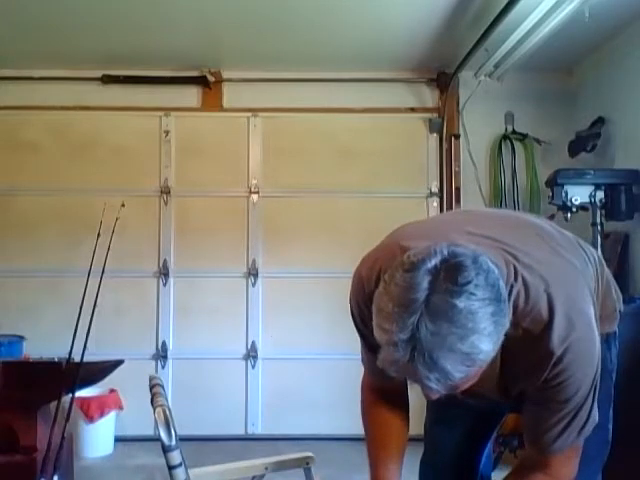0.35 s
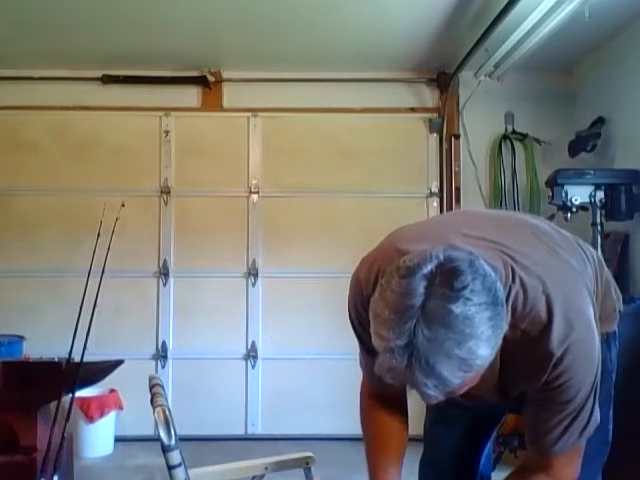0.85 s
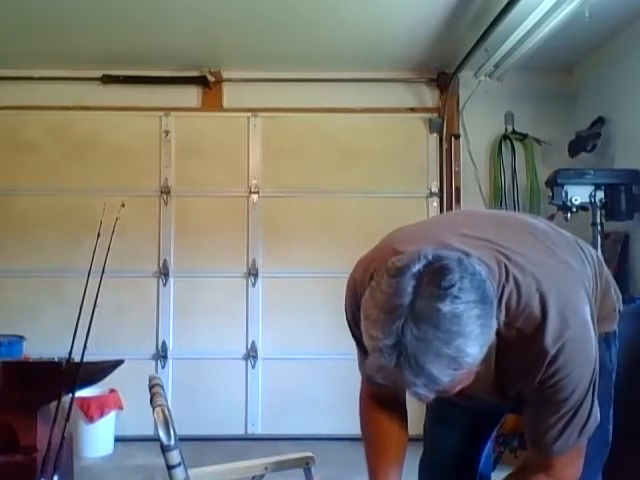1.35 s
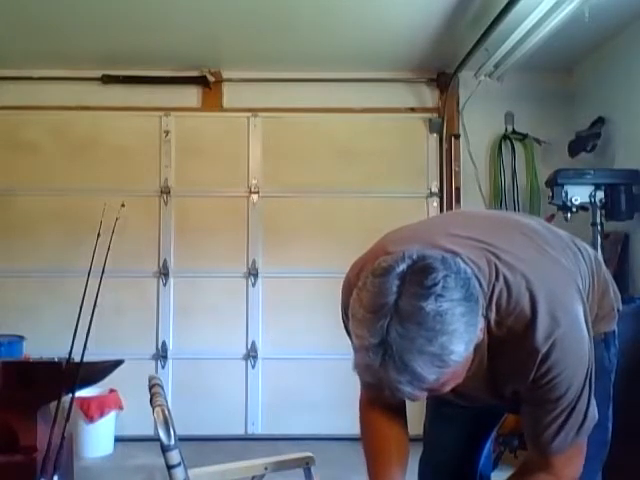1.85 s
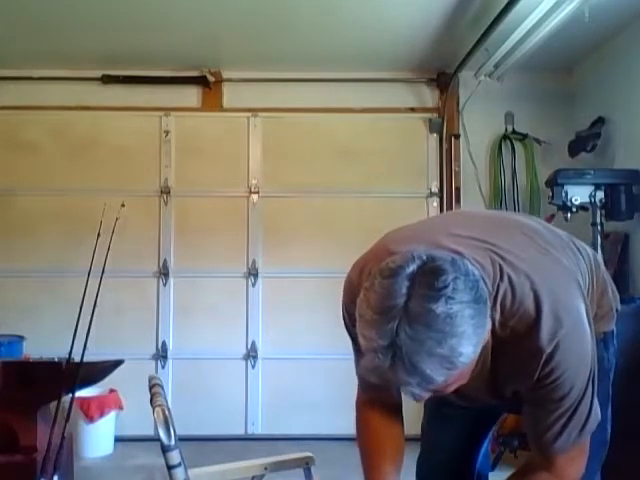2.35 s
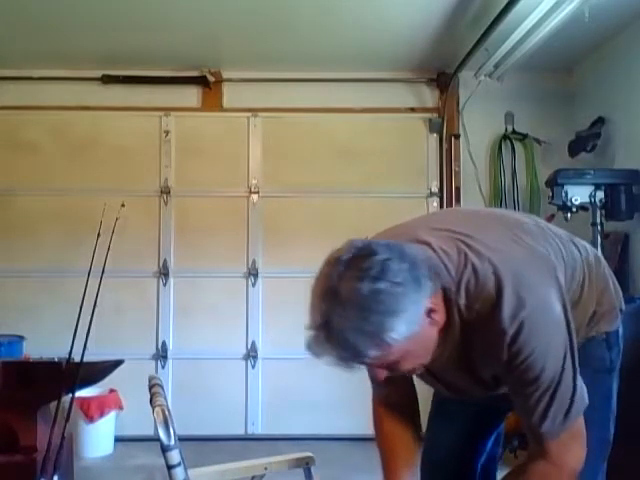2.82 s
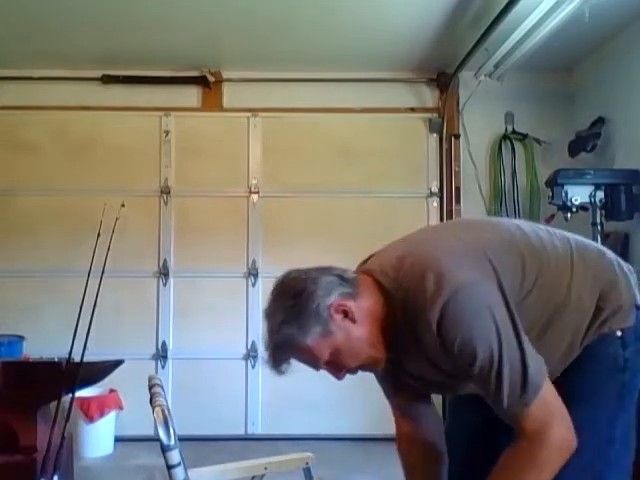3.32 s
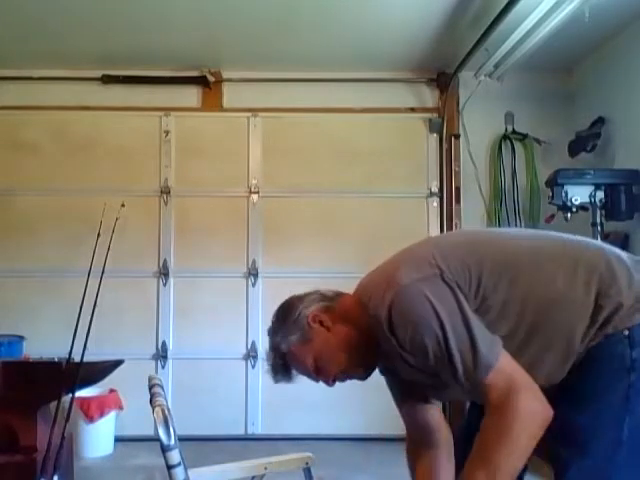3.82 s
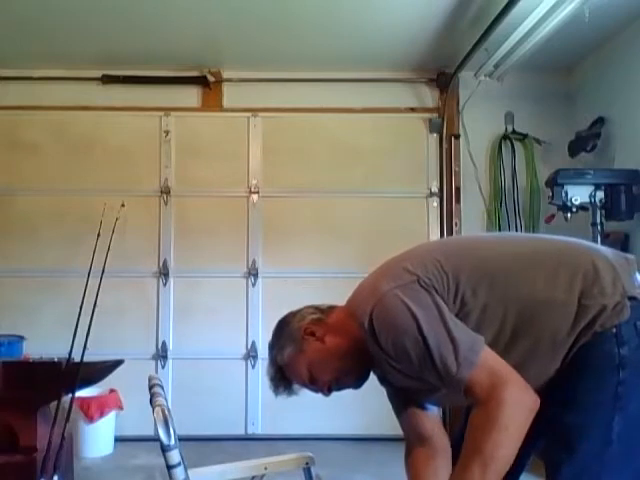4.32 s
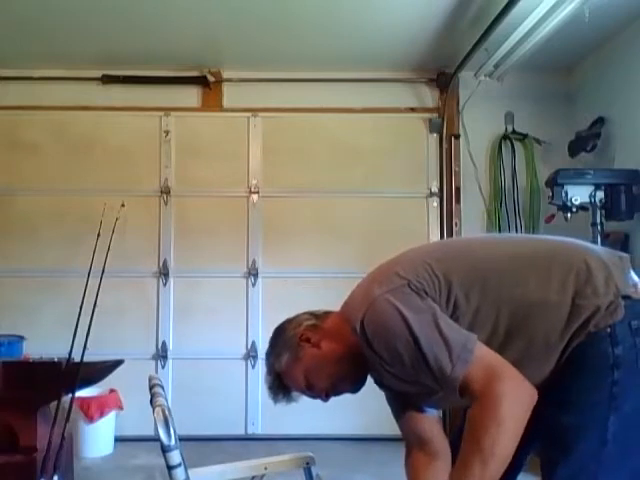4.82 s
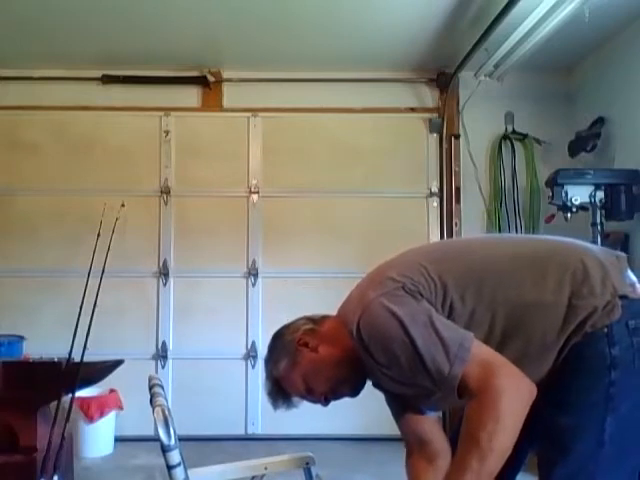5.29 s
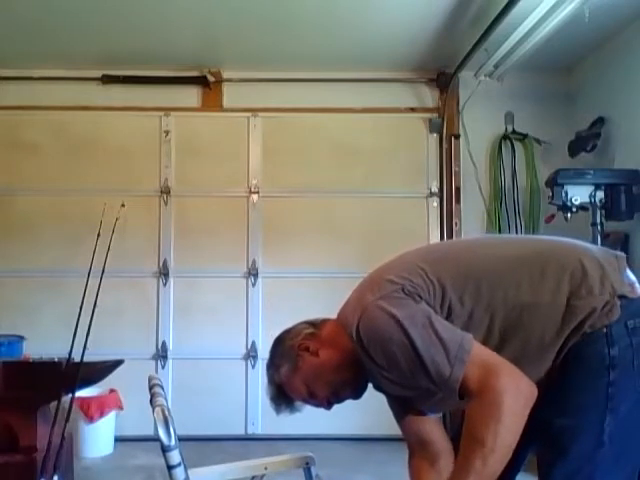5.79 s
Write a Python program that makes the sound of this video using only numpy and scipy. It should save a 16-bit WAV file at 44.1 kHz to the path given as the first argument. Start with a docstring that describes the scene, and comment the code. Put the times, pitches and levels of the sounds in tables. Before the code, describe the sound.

A bare garage murmurs very softly throughout with unsteady low rumble, faint machine hum and airy hiss. From about 0.4 s, small metal parts tap plastic pipe: dry clicks with a hollow, nasal ring around 1.4 kHz and a short grainy room echo. At 1.0 s a hard knock leaps out, thuds dully and is quickly choked. Tiny taps follow until 2.3 s, when a loud, bright metallic cluster rattles for a quarter second and cuts off. Near 3 s a shoe scuffs gritty concrete, swelling again into a brief sharp knock at 3.3 s. Sparse taps continue, with brighter metal ticks at 4.1, 4.75 and 4.95 s. From 5.0 to 5.6 s a part slides with a barely audible pipe-coloured hiss among small clicks. At 5.9 s a loud hollow knock bursts from a quick clatter, then sinks into last ticks around 6 s. Mono, narrow-band, treble steeply cut near 9 kHz.

```python
"""A bare garage hums, rumbles and hisses faintly: unsteady sines over shaped noise.
From 0.4 s small metal parts click and knock on plastic pipe near a narrow-band microphone; each contact
drives pipe and metal resonances plus a noise echo. Four loud knocks leap out (1.0, 2.3, 3.3, 5.9 s) by a
gain that soon sinks and cuts their echo short; dull thumps lie inside them. At about 3 s a shoe scuffs the
floor (swelling noise); from 5.0 s a part slides along the pipe (noise through its resonances)."""
import sys
import numpy as np
from scipy import signal
from scipy.fft import rfft, irfft, next_fast_len
from scipy.io import wavfile
from scipy.ndimage import uniform_filter1d, map_coordinates

SR = 44100
rng = np.random.default_rng(int(sys.argv[2]) if len(sys.argv) > 2 else 0)


def log_audio(samples):
    """Write samples as a 16-bit WAV file to the path given in sys.argv[1]."""
    # one column per channel
    frames = np.atleast_2d(samples).T
    # limit to full scale, then quantise
    limited = np.clip(frames, -1, 1)
    pcm = np.round(limited * 32767).astype(np.int16)
    wavfile.write(sys.argv[1], SR, pcm)


def undo_db(level):
    """Turn decibels back into plain size, where 20 dB means ten times bigger."""
    steps = np.asarray(level, float) / 20
    return 10 ** steps


N = 271656


def unit(x):
    """Scale to rms 1."""
    return x / np.sqrt(np.mean(x ** 2) + 1e-20)


def along(points, hz):
    """Interpolate (frequency [Hz], value) points on a log frequency axis."""
    f, v = np.transpose(points)
    return np.interp(np.log(hz + 1), np.log(f + 1), v)


def wobble(knots_per_s):
    """Smooth random curve through normal-distributed knots."""
    knots = rng.standard_normal(int(N * knots_per_s / SR) + 4)
    return map_coordinates(knots, [np.arange(N) * knots_per_s / SR])


def coloured(spectrum):
    """Noise of rms 1 with the given spectrum."""
    size = next_fast_len(N)
    gain = undo_db(along(spectrum, np.fft.rfftfreq(size, 1 / SR)))
    return unit(irfft(rfft(rng.standard_normal(size)) * gain, size)[:N])


def patches(shape):
    """Random field of rms 1, smooth over neighbouring pitches and moments."""
    over_pitch = uniform_filter1d(rng.standard_normal(shape), size=3, axis=0)
    return unit(uniform_filter1d(over_pitch, size=7, axis=1))


def resonances(modes, f, scatter_db):
    """Causal response of damped modes, each at a new strength, with alternating sign."""
    scatter = rng.normal(0, 1, len(modes)) * scatter_db
    response = 0
    for k, (centre_hz, width_hz, db) in enumerate(modes):
        damping = 1j * f * width_hz
        mode = damping / (centre_hz * centre_hz - f * f + damping)
        response = response + (-1) ** k * undo_db(db + scatter[k]) * mode
    return response


# Low rumble spectrum: (frequency [Hz], relative density [dB per Hz])
RUMBLE = [(24, -78.5), (40, -55), (91, -47), (111, -13), (134, 1.5), (192, 4), (233, -3.5), (428, -6),
          (538, -13.5), (700, -12.5), (910, -46), (1540, -120)]
# Air hiss spectrum: (frequency [Hz], relative density [dB per Hz])
AIR = [(290, -56), (500, -20.5), (544, -18), (584, -18), (838, -6.5), (911, -10), (1010, -2), (1170, -10),
       (1440, -11.5), (1680, -11.5), (1850, -15), (2300, -19.5), (2470, -23), (5780, -26), (8800, -42.5),
       (11400, -74), (19400, -120)]
# Machine tones: (frequency [Hz], relative level [dB])
HUM = [(177.6, -82.5), (296.1, -77), (430.7, -87), (468.3, -84), (818.3, -82), (1007, -87.5), (1480, -88.5)]


def room():
    """Low rumble, air hiss and machine tones unsteady in level and phase."""
    t = np.arange(N) / SR
    rumble = undo_db(-69 + 0.42 * wobble(2.7)) * coloured(RUMBLE)
    hiss = undo_db(-69.5 + 0.61 * wobble(6)) * coloured(AIR)
    hum = 0
    for hz, db in HUM:
        level = undo_db(db + 2.5 + 0.73 * wobble(12))
        hum = hum + level * np.sin(2 * np.pi * hz * t + 4.5 * wobble(9.3))
    return rumble + hiss + hum


# Wall decay: (frequency [Hz], t60 [s])
WALLS = [(800, 0.59), (2000, 0.69), (4000, .55), (8000, .5)]


def echo(size):
    """Fresh wall answer: noise patchy in time and pitch, each frequency dying at its own speed."""
    hz, t, z = signal.stft(rng.standard_normal(size), SR, nperseg=256)
    patchy_db = 2.5 * patches(z.shape)
    decay_db = -60 * t / along(WALLS, hz)[:, None]
    return signal.istft(z * undo_db(patchy_db + decay_db), SR, nperseg=256)[1][:size]


# Contacts before leaps: (time [s], level [dB], relative pipe ring [dB], click boost centre [Hz],
# relative wall echo [dB])
CONTACTS = [(0.4409, -54, 2.5, 2300, -7), (0.5731, -55.5, -2.5, 2230, -9), (0.9328, -48, -4.5, 3700, -8.5),
            (1.0345, -52, 5, 2410, -5.5), (1.047, -45.5, 2.5, 2476, -14), (1.4508, -60.5, 1, 3650, -10),
            (1.9532, -63, 3.5, 2320, -3.5), (2.0348, -63, -1.5, 3740, -1.5),
            (2.1735, -53.5, -3.5, 2440, -8.5), (2.257, -63.5, 6.5, 2430, 9.5),
            (2.2785, -34.5, -1.5, 4320, -5.5), (2.2936, -32, -6, 4080, -6), (2.3217, -36, 0, 3310, -8.5),
            (2.3449, -44, 2.5, 3660, -10), (3.2595, -44.5, -0.5, 2400, -8), (3.4134, -54.5, 1.5, 2270, -11),
            (3.7778, -56, -4.5, 3010, -11.5), (4.0838, -49, -17.5, 5600, -13.5),
            (4.7254, -54.5, -2, 2265, -6.5), (4.7521, -45.5, -15.5, 4190, -10),
            (4.78, -51.5, 0.5, 5420, -6.5), (4.9559, -40.5, -20, 3040, -9.5),
            (5.3014, -52.5, -5.5, 4130, -5.5), (5.3208, -53.5, -22, 5810, -13),
            (5.5797, -44, -15.5, 5900, -13), (5.8033, -63, 1, 2620, -7), (5.8212, -55.5, -5.5, 2730, -2),
            (5.8481, -46.5, 4, 4530, -5.5), (5.8741, -40, -2, 2540, -10.5),
            (5.8915, -47.5, -2.5, 3850, -22), (5.9241, -58.5, 7, 2630, -8), (5.9564, -50, -4, 3970, -8.5),
            (5.9946, -51.5, 1.5, 3980, -11), (6.0578, -48.5, -24, 5500, -7.5)]
# Pipe modes: (frequency [Hz], width [Hz], relative mean level [dB])
PIPE = [(1431.7, 48.7, -0.02), (1532.3, 44, -7), (1760, 13, -10.5), (2410, 190, -16)]
# Click spectrum: (frequency [Hz], relative density [dB per Hz])
CLICK = [(300, -50.5), (600, -22.5), (950, -13), (1150, 4), (2000, -1.5), (3000, -2), (5000, -1.5),
         (7000, -5.5), (7700, -17), (8000, -41), (8300, -30), (8900, -38), (9400, -66.5), (12000, -85),
         (19000, -110)]
# Metal modes: (frequency [Hz], width [Hz], relative mean level [dB])
METAL = [(3440, 23, -0.9), (3660, 70, -5), (3940, 70, -2.5), (4746, 120, 3), (5400, 47, -7), (5860, 18, -9),
         (6350, 120, -11.5)]
METAL_DB, METAL_DB_PER_DB = -10, 0.65  # metal gain for a -47 dB contact; growth with contact level
MIC_LOW_HZ, MIC_TOP_HZ = 320, 8220  # pickup band of the pipe ring


def contacts():
    """A short crack clicks and rings the metal, a push rings the pipe; the walls answer both."""
    size = 2 ** 15
    lead = size // 64  # room ahead of each onset
    t, f = np.arange(size) / SR, np.fft.rfftfreq(size, 1 / SR)
    pickup = 1 / (1 + (f / MIC_TOP_HZ) ** 20) / (1 + (MIC_LOW_HZ / (f + 1)) ** 2)
    out = np.zeros(N + size)
    for s, db, pipe_db, bright_hz, echo_db in CONTACTS:
        walls = undo_db(echo_db) * echo(size) * (1 - np.exp(-t / 0.0072))  # the echo needs time to build
        crack = rng.standard_normal(size) * undo_db(-60 * t / 0.032) * (1 - np.exp(-t / 0.0015))
        push = 9 * undo_db(-60 * t / 0.0002)

        boost_db = 7.52 * np.exp(-(np.log((f + 1) / bright_hz) / 0.4) ** 2)
        click = undo_db(along(CLICK, f) + boost_db - 3.5)
        metal_gain = undo_db(METAL_DB + METAL_DB_PER_DB * (db + 47))
        click = click + metal_gain * resonances(METAL, f, scatter_db=7.0)
        ring = undo_db(pipe_db + 21) * resonances(PIPE, f, scatter_db=1.5) * pickup

        clicked = rfft(np.roll(crack + walls, lead)) * click
        rung = rfft(np.roll(push + 0.67 * walls, lead)) * ring
        start = round(s * SR) - lead
        out[start:start + size] += undo_db(db) * irfft(clicked + rung, size)
    return out[:N]


# Leaps of the handling sounds: (start [s], held until [s], sinking time [s], leap [dB])
LEAPS = [(1.034, 1.059, 0.054, 25.5), (2.279, 2.514, .032, 22.5), (3.257, 3.285, 0.0114, 20),
         (5.87, 5.896, 0.094, 26.5)]
LEAP_RISE_S, RAGGED_DB = 0.006, 3.5  # the sinking is uneven
EARLY_PER_OCTAVE, EARLY_UNDER_HZ = 0.12, 1900  # the bass lets go sooner (share of the hold)


def leaps(x):
    """The handling sounds rise quickly, hold, then sink back band by band."""
    hz, t, z = signal.stft(x, SR, nperseg=128)
    early = np.clip(EARLY_PER_OCTAVE * np.log2(EARLY_UNDER_HZ / (hz[:, None] + 1)), 0, 0.5)
    gain_db, ragged_db = 0, RAGGED_DB * patches(z.shape)
    for s, until, sink, db in LEAPS:
        release = until - early * (until - s)
        left = np.clip(1 - (t - release) / sink, 0, 1)
        risen = np.clip((t - s) / LEAP_RISE_S, 0, 1)
        gain_db = gain_db + db * risen * left + ragged_db * np.sin(np.pi * left)
    return signal.istft(z * undo_db(gain_db), SR, nperseg=128)[1][:N]


# Dull thumps inside the knocks: (time [s], peak [dB], frequency [Hz], 1/e width [s])
THUMPS = [(1.055, -35.5, 836, 0.004), (1.061, -43.5, 512, 0.0033), (2.335, -45, 631, 0.022),
          (2.342, -45.5, 400, 0.01), (2.386, -56.5, 175, 0.014), (3.28, -44, 424, 0.0028),
          (5.888, -37, 864, 0.0095), (5.901, -43, 393, 0.0065), (5.936, -46.5, 174, 0.01),
          (6.012, -53, 176, .012)]


def thumps():
    """Each is one soft low swing under a bell-shaped envelope."""
    t = np.arange(N) / SR
    out = np.zeros(N)
    for s, db, hz, length in THUMPS:
        bell = np.exp(-(2 * (t - s) / length) ** 2)
        out += undo_db(db) * bell * np.cos(2 * np.pi * hz * (t - s))
    return out


# Scuff strokes: (loudest time [s], nominal level [dB], rise [s], dying t60 [s])
SCUFF = [(2.97, -66.5, 0.088, 0.47), (3.235, -57.5, 0.054, 0.62)]
# Sole spectrum: (frequency [Hz], relative density [dB per Hz])
SOLE = [(530, -43), (900, -12), (1600, -2.5), (1990, 1), (2620, -3), (3840, -9), (5950, -11), (8800, -35),
        (11400, -84), (19400, -120)]


def scuff():
    """A sole drags over gritty concrete: each stroke of noise swells, then dies away."""
    t = np.arange(N) / SR
    strokes = np.zeros(N)
    for s, db, rise, t60 in SCUFF:
        swell = np.exp(-(np.minimum(t - s, 0) / rise) ** 2)
        strokes += swell * undo_db(db - 60 * np.maximum(t - s, 0) / t60)
    return strokes * undo_db(1.1 * wobble(60)) * coloured(SOLE)


# Slide along the pipe: (start [s], full [s], full until [s], end [s])
RUB_S = (5.04, 5.14, 5.5, 5.62)


def rub():
    """Faint friction hisses through the pipe's resonances, brighter than a push."""
    f = np.fft.rfftfreq(N, 1 / SR)
    tilt = np.clip(f, 1, 2900) ** 3.5 / (1 + (f / 3000) ** 8)
    response = resonances(PIPE, f, scatter_db=0.0) * tilt
    hiss = irfft(rfft(rng.standard_normal(N)) * response, N)
    fade = np.interp(np.arange(N) / SR, RUB_S, [0, 1, 1, 0])
    return undo_db(-72.5 + 2.0 * wobble(23)) * unit(hiss) * fade


def scene():
    """All sources, one channel; only contacts and scuff pass through the leaps."""
    handling = leaps(contacts() + scuff())
    return (room() + handling + thumps() + rub())[None]


def roll_off(x):
    """The treble ends steeply here."""
    return signal.sosfilt(signal.butter(12, 8950, fs=SR, output="sos"), x)


def record(dry):
    """Deliver the finished mix."""
    return roll_off(dry)


dry = scene()
out = record(dry)
log_audio(out)
```